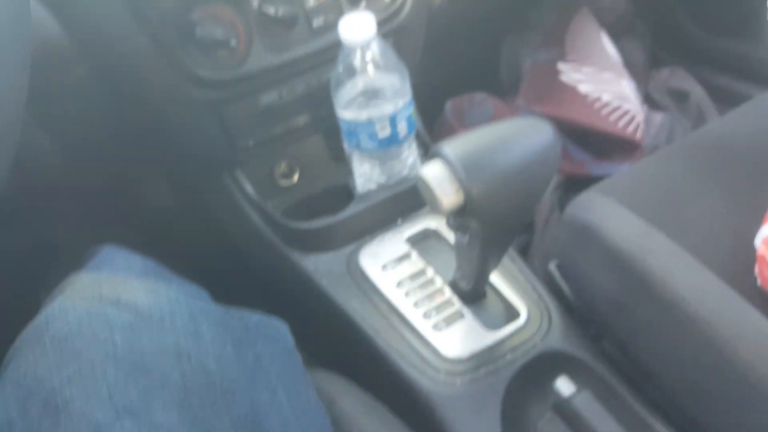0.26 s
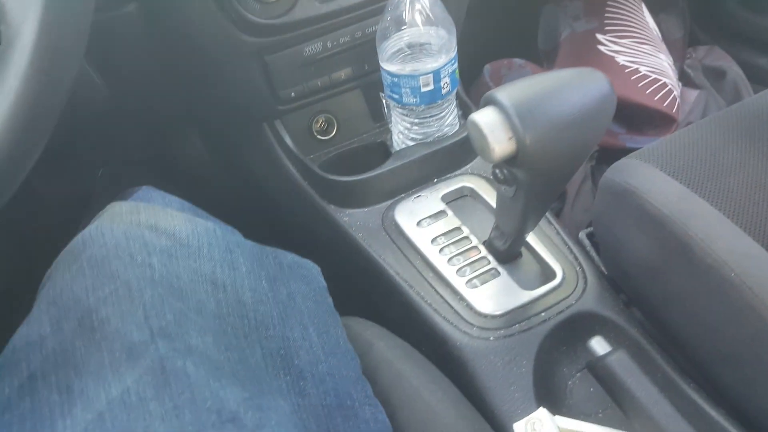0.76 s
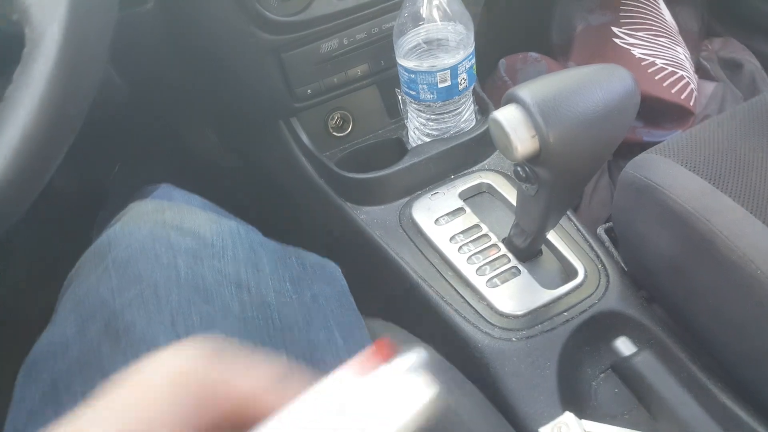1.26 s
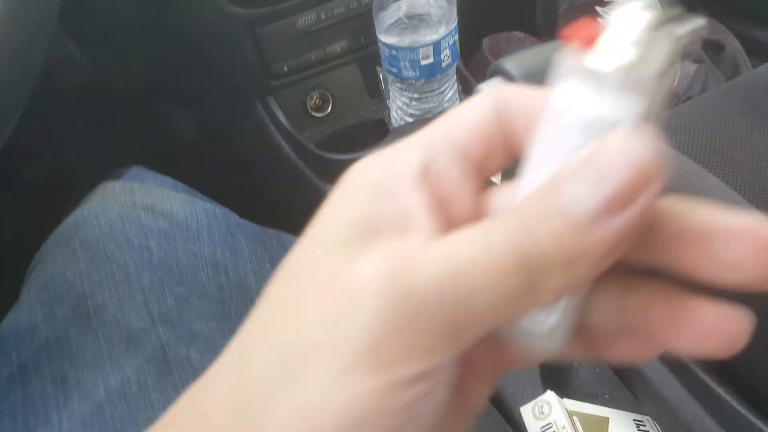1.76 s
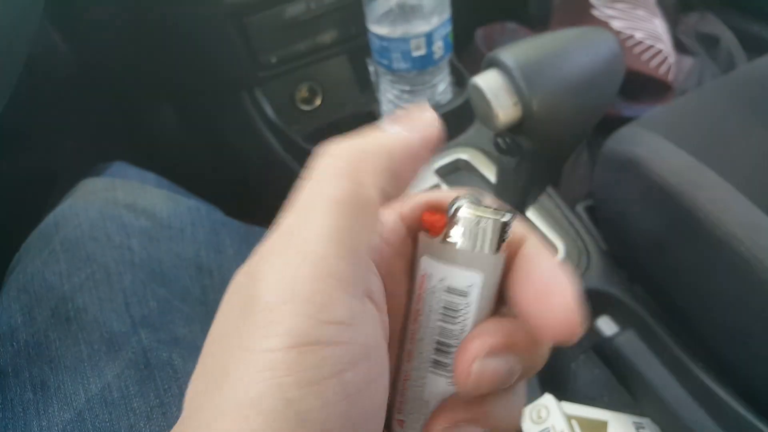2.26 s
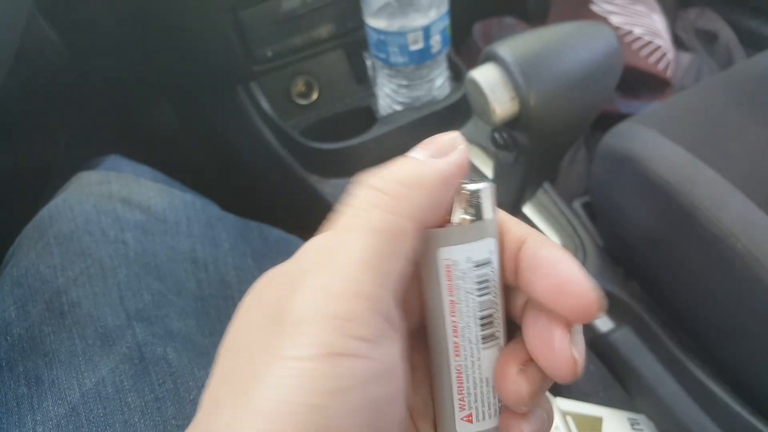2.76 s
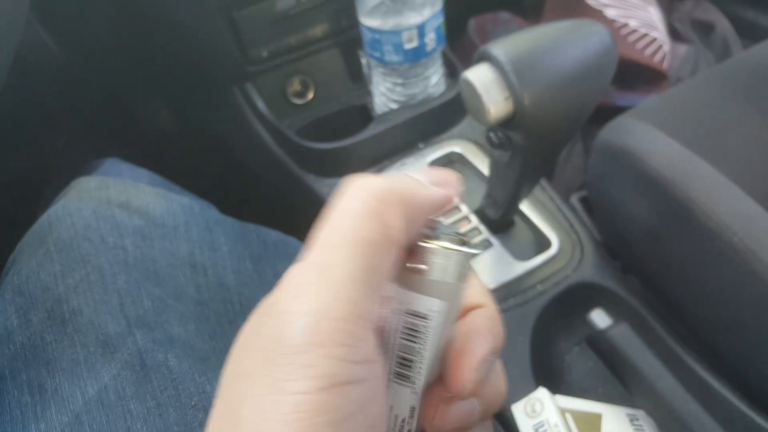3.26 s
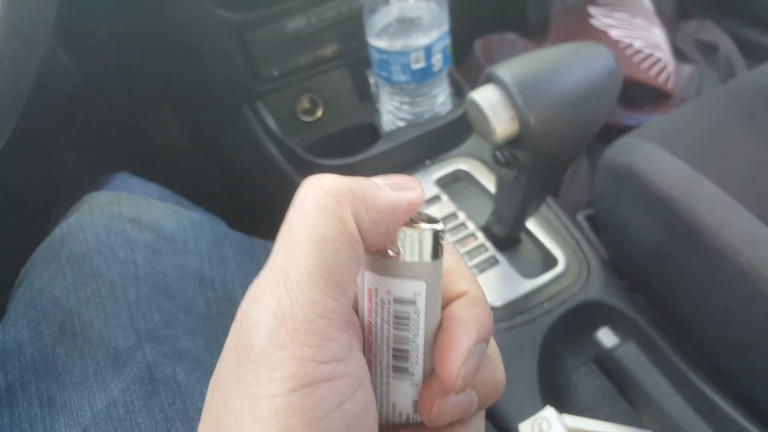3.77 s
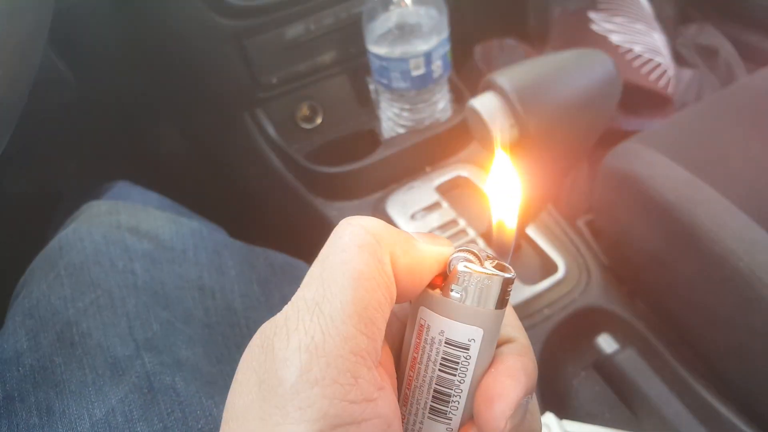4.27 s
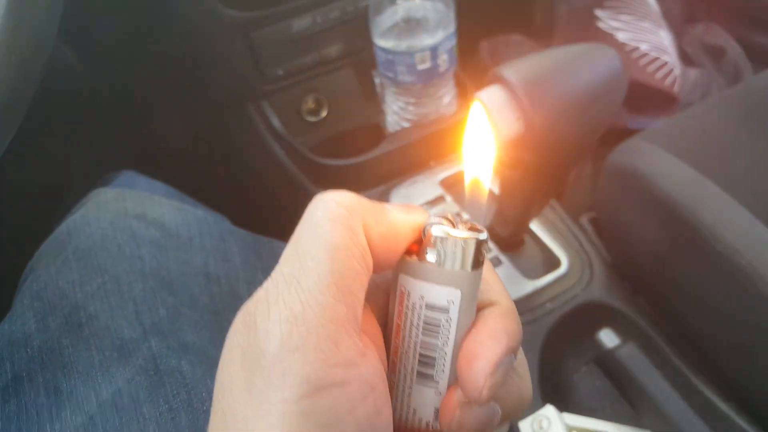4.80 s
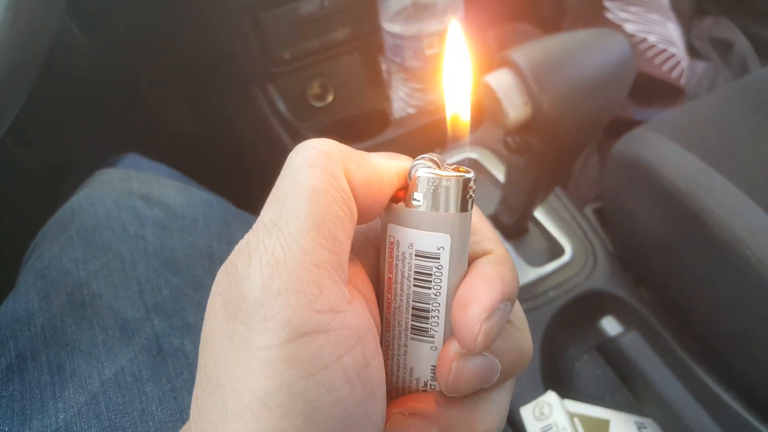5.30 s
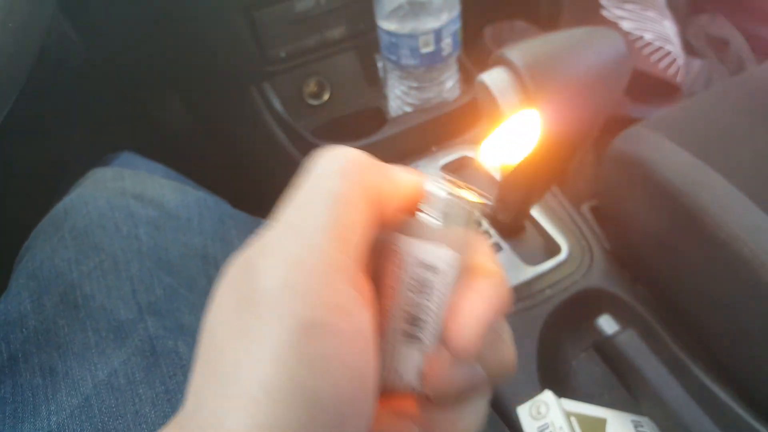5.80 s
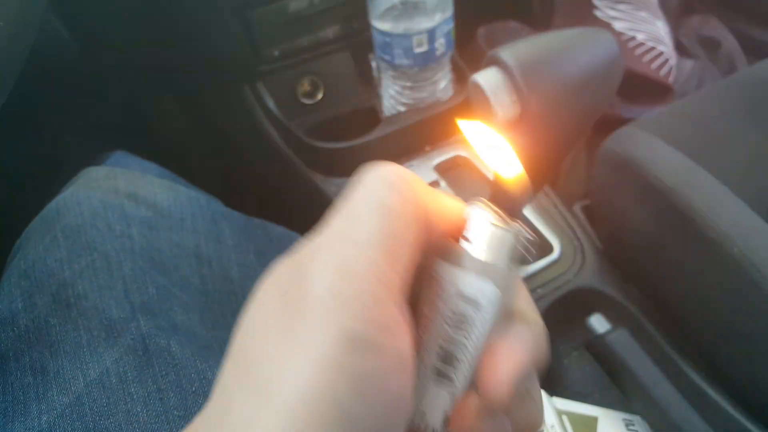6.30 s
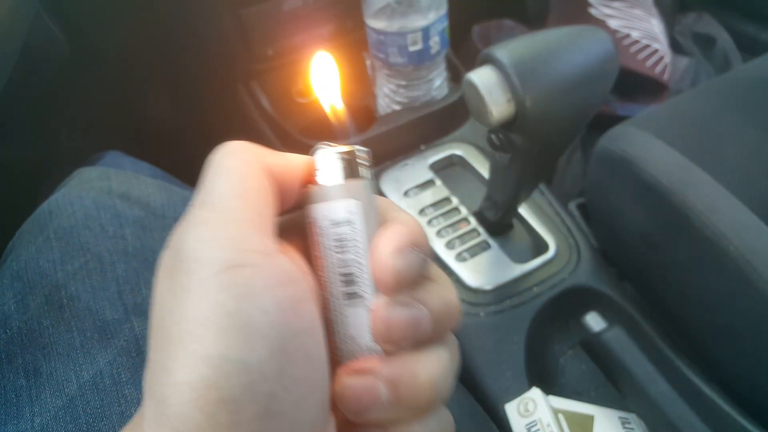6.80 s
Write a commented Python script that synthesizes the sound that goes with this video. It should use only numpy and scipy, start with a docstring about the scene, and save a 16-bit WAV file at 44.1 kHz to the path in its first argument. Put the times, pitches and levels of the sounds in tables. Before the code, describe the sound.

A low, slightly throbbing engine idle with faint belt and fan tones and soft ventilation air fills a small, dry car cabin for about seven seconds. From 0.1 to 0.65 s, hard plastic knocks rattle in the console, slightly right; the strongest, at 0.37 s, cracks and overloads the close microphone, and the hum dips for about a second before recovering. Weaker knocks trail to 0.9 s. Between 0.55 and 2.2 s, a sleeve and fingers brush in faint airy hisses, with tiny taps near 1.6 and 1.75 s. Minute clicks continue to 3.45 s, where a barely audible skin squeak sounds. At 3.93-4.02 s the spark wheel rasps in accelerating jerks, ending in a bright metallic snap with a short ring and a very faint gas rush. Tiny clicks follow at 4.16 and 4.28 s, then hum alone. The lever clicks at 6.98 s, more softly at 7.04 s.

```python
"""A car engine idles under moving air, and at once hard knocks ring the plastic console as a lighter is fished out.
A sleeve brushes past, fingers turn the lighter, and the spark wheel rasps in jerks under the thumb and lights it.
The lever clicks back at the end. Knocks and clicks are struck resonances, rasp and rubbing are shaped noise,
and the engine is a sum of harmonics of its firing rate.
The loudest knock overloads the microphone, whose gain control ducks the engine for about a second."""
import sys
import numpy as np
from scipy import signal
from scipy.fft import rfft, irfft
from scipy.io import wavfile
from scipy.ndimage import minimum_filter1d

SR = 44100
rng = np.random.default_rng(int(sys.argv[2]) if len(sys.argv) > 2 else 0)


def pcm_store(signal):
    """Save signal as 16-bit PCM."""
    levels = np.round(np.clip(np.atleast_2d(signal), -1, 1) * 32767)
    wavfile.write(sys.argv[1], SR, levels.astype(np.int16).T)


N = 310905
TIME = np.arange(N) / SR
AGE = np.arange(8192) / SR  # seconds since a contact

# knocks in the console; levels compare energy with 3 ms at rms 1:
# start_s, thud_level_db, contact_hardness_hz, crack_level_db, crack_top_hz
KNOCKS = [(0.0973, -17.5, 1250, -43.5, 2100), (0.2354, -12.5, 1750, -25.5, 3140),
          (0.2569, -21.5, 496, -27.5, 4500), (0.2995, -56, 700, -48, 8000), (0.3475, -13, 552, -33, 3000),
          (0.367, 3, 1570, -16, 3300), (0.3747, -17, 1000, -17, 3340), (0.4019, -25, 1100, -11.5, 15000),
          (0.4046, -8, 550, -27, 9000), (0.44, -45, 1010, -33, 14000), (0.4533, -20.5, 704, -31, 3300),
          (0.4603, -30, 605, -28.5, 4500), (0.4687, -18.5, 380, -57, 3000),
          (0.5237, -31.5, 400, -42.5, 6100), (.578, -29.5, 480, -44, 2600), (0.5903, -26, 515, -29, 15300),
          (0.606, -30, 350, -60, 5900), (0.623, -40, 1300, -50, 10000), (0.635, -37, 1500, -62, 2010),
          (0.735, -41, 500, -58, 3000), (0.8863, -30.5, 600, -45.5, 3270), (1.754, -40.5, 1090, -63, 2000),
          (1.767, -35.5, 380, -72, 2000)]
# resonances of the console: pitch_hz, relative_level_db, t60_s
CONSOLE_MODES = [(324, -7.5, 0.1), (422, 1.5, 0.065), (499, -4, 0.043), (585, 9.5, 0.035),
                 (686, 8.5, 0.029), (887, 2.5, 0.043), (1017, -1, 0.034), (1486, 2, 0.035),
                 (1602, 5.5, .03), (1950, 6.5, 0.021)]
# crack of hard plastic: frequency_hz, relative_density_db
CRACK_SPECTRUM = [(200, -38), (400, -15), (1100, -2), (1700, 4), (2800, 1.5), (4200, -4.5), (6000, 0),
                  (8500, -1.5), (10500, -7.5), (13000, -2), (16000, -15.5)]

# the wheel gives way in jerks, each harder, until the thumb lands; then it coasts:
# start_s, drive_length_s, force_db, run_down_s
JERKS = [(3.933, 0.043, -50.5, .004), (3.968, 0.013, -36.5, .004), (3.983, 0.015, -26, .004),
         (3.993, .009, -23, .0008), (4.009, .004, -32, .011)]
GRIP_SHARE = 0.5  # the teeth bite over this first share of each jerk
# rasp of the wheel turning slowly, then spinning: frequency_hz, relative_density_db
SLOW_RASP_SPECTRUM = [(900, -21.5), (2300, -4.5), (3400, -2.5), (4800, -8), (6700, 1.5), (8500, -3),
                      (10500, -11.5), (13500, -13.5), (16000, -10)]
FAST_RASP_SPECTRUM = [(400, -39), (1400, -18), (1750, -4), (2100, -3.5), (2900, 1.5), (3900, 1.5),
                      (4500, -7.5), (5600, -3), (6600, 0.5), (7700, -3.5), (8500, 0), (10200, -6.5),
                      (11500, 1), (13900, -0.5), (16000, -7.5)]
# resonances of the metal hood and wheel: pitch_hz, relative_level_db, t60_s
HOOD_MODES = [(1314, -20.5, 0.53), (2320, -3, .1), (2400, 0, 0.1), (2843, -11, 0.039), (2840, -0.5, 0.11),
              (3080, -3, 0.092), (3290, 4, 0.069), (3380, -0.5, 0.14), (3465, -0.5, 0.055),
              (4230, -3.5, .04), (6085, -11.5, .04), (8390, 1, 0.047), (11000, -4, 0.037),
              (14000, -7, 0.032)]
# clicks of the lever and hood, the ring being what the damping thumb leaves of it:
# start_s, level_db, scrape_decay_s, ring_relative_to_snap_db
CLICKS = [(1.6158, -50, 0.0046, -6), (1.9561, -61, 0.0027, -18), (2.3676, -63, 0.0073, 0),
          (2.876, -49.5, 0.021, -13), (3.1189, -54, 0.0004, -11), (3.3419, -54.5, .007, -4),
          (3.445, -58, 0.021, -6), (3.9986, -16, 0.0016, -9), (4.0029, -24.5, .001, -10.5),
          (4.1576, -50, 0.0024, -17), (4.2843, -61, .002, -12), (6.9815, -37.5, 0.0038, -9.5),
          (7.0432, -46, 0.0044, -1)]

# the gas catches, burns off and settles
FLARE_AT_S, FLARE_RISE_S, FLARE_HOLD_S, FLARE_FADE_S, FLARE_DB = 4.005, 0.025, 0.08, 0.049, -57.5
# rush of the burning gas: frequency_hz, relative_density_db
FLARE_SPECTRUM = [(500, -12), (1400, -3.5), (3200, 1), (4500, -9), (7000, -7.5), (10000, -13.5),
                  (16000, -16.5)]
# the thumb slips on the wheel with a tiny squeak as it takes its grip
SQUEAK_AT_S, SQUEAK_WIDTH_S, SQUEAK_HZ, SQUEAK_DB = 3.459, 0.014, 3240, -56.5

# strokes of sleeve and fingers, level before the low cut:
# fastest_moment_s, speeding_up_s, slowing_down_s, level_db, lowest_hz
STROKES = [(.56, .02, .015, -57.5, 3000), (.95, 0.06, .09, -57, 2000), (1.12, 0.054, 0.024, -56.5, 2500),
           (1.39, 0.094, 0.18, -62, 500), (1.61, 0.091, 0.12, -58, 980), (1.855, .025, 0.033, -63, 6000),
           (2.04, 0.057, 0.038, -54, 5000), (2.175, .03, .014, -62, 3000)]
# hiss of fibres and skin: frequency_hz, relative_density_db
RUB_SPECTRUM = [(600, 6), (1500, 0.5), (3000, 4.5), (6000, 1.5), (10000, -4), (14000, -3), (16000, -16)]

FIRING_HZ, FIRST_FIRING_S = 20.423, 0.0403
# engine boom in the cabin: multiple_of_firing_rate, relative_level_db
ENGINE_ORDERS = [(1, -3), (1.5, -17), (2, 3), (3, -11), (4, -1.5), (5, -4), (6, -4.5), (8, -13)]
ENGINE_DB = -40.5  # rms of the boom
# steady tones of belt drive and fan, level before wavering: pitch_hz, rms_level_db
WHINES = [(33, -61), (107.9, -47), (215.3, -56), (285.3, -61.5), (318, -59), (431.5, -75.5), (449, -65.5),
          (463.5, -69), (497, -76.5)]
# rumble and ventilation air: frequency_hz, relative_density_db
AIR_SPECTRUM = [(12, -10), (45, -4.5), (115, 1), (200, -9), (440, -13.5), (700, -26), (900, -21.5),
                (1250, -31), (2050, -33), (2230, -29.5), (2550, -37.5), (5500, -50.5), (10800, -55.5),
                (13500, -50.5)]
AIR_DB = -42  # rms of the part common to both ears
# likeness of a diffuse field at the two microphones: frequency_hz, coherence (0 to 1)
COHERENCE = [(50, 0.92), (200, 0.92), (500, .75), (1000, 0.69), (2500, 0.3), (6000, 0)]

# decay of the upholstered cabin: frequency_hz, t60_s
CABIN_DECAY = [(250, 0.037), (800, 0.072), (2500, 0.045), (6000, 0.034), (14000, 0.051)]
# the right microphone faces the console and the hands: frequency_hz, left_minus_right_db
CONSOLE_BALANCE = [(700, -1), (1300, 0), (2400, -4), (4400, -12.5), (7000, -8.5), (10000, 1),
                   (15000, -10.5)]
LIGHTER_BALANCE = [(700, -3), (1700, 4.5), (2400, -9), (3400, -7.5), (7000, -7.5), (10000, -2.5),
                   (14000, -4.5)]
EDGE_HZ = 16050  # upper band limit


def console(crack_s=0.0056, lowest_hz=320, panel_db=-9, panel_s=0.002):
    """Modal excitation: a soft contact reaches only the console's low modes, a hard one the high ones too."""
    out = np.zeros(N)
    # panels this small radiate no bass
    body = low_cut(ring(CONSOLE_MODES), lowest_hz, order=6)
    # the higher panel modes crowd together into a short rattle
    crowded = signal.butter(2, [900, 2300], "band", fs=SR, output="sos")
    for start, thud_db, hardness_hz, crack_db, top_hz in KNOCKS:
        panel = signal.sosfilt(crowded, scrape(panel_s))
        struck = blow(body) + gain_of(panel_db) * blow(panel)
        thud = darken(struck, hardness_hz, order=2)
        crack = darken(colour(scrape(crack_s), CRACK_SPECTRUM), top_hz, order=1)
        add(out, start, gain_of(thud_db) * blow(thud) + gain_of(crack_db) * blow(crack))
    return out


def wheel(slips_per_s=9000, spin_db=-31, ring_db=-11):
    """Stick-slip: teeth tear at the flint in tiny slips, brighter once spun up, and drive the hood's modes."""
    force = np.zeros(N)
    for start, length, db, run_down in JERKS:
        force += gain_of(db) * envelope(start, GRIP_SHARE * length, length, run_down)
    slips = grains(slips_per_s, spread_db=3.5)
    # the strongest force so far stands for the wheel's speed
    speed = np.maximum.accumulate(force)
    spin = speed / (speed + gain_of(spin_db))
    slow = evened(colour(slips, SLOW_RASP_SPECTRUM))
    fast = evened(colour(slips, FAST_RASP_SPECTRUM))
    rasp = force * (slow * (1 - spin) + fast * spin)
    hood = ring(HOOD_MODES)
    ringing = signal.oaconvolve(force * evened(slips), hood / np.linalg.norm(hood))[:N]
    return rasp + gain_of(ring_db) * ringing


def lever():
    """Impact and free vibration: small metal parts snap against each other and ring."""
    out, hood = np.zeros(N), blow(ring(HOOD_MODES))
    for start, db, length, ring_db in CLICKS:
        snap = blow(colour(scrape(length), FAST_RASP_SPECTRUM))
        add(out, start, gain_of(db) * (snap + gain_of(ring_db) * hood))
    return out


def flare():
    """Combustion noise: the first gas burns off in a soft broadband rush."""
    burn = gain_of(FLARE_DB) * envelope(FLARE_AT_S, FLARE_RISE_S, FLARE_HOLD_S, FLARE_FADE_S)
    return burn * evened(colour(rng.standard_normal(N), FLARE_SPECTRUM))


def squeak(jitter=0.045):
    """Stick-slip oscillation: skin grips and slips on the metal at an unsteady pitch."""
    cycles = np.cumsum(SQUEAK_HZ * (1 + jitter * drift(300))) / SR
    bell = np.exp(-((TIME - SQUEAK_AT_S) / SQUEAK_WIDTH_S) ** 2)
    return gain_of(SQUEAK_DB) * bell * np.sin(2 * np.pi * cycles)


def rubbing(uneven=0.13, right_db=2):
    """Sliding friction: a fine, diffuse hiss follows the speed of each stroke along a bell."""
    hiss = np.array([evened(colour(ear, RUB_SPECTRUM)) for ear in rng.standard_normal((2, N))])
    out = np.zeros((2, N))
    for fastest, rise, fall, db, lowest_hz in STROKES:
        width = np.where(TIME < fastest, rise, fall)
        speed = np.exp(-((TIME - fastest) / width) ** 2)
        out += gain_of(db) * speed * low_cut(hiss, lowest_hz, order=2)
    return out * (1 + uneven * drift(40)) * gain_of([[0], [right_db]])


def engine(firings, shake=0.11, wobble=0.13, waver=0.25):
    """Harmonic series: firings, no two quite alike, boom through the body under wavering belt and fan tones."""
    boom = np.zeros(N)
    for order, db in ENGINE_ORDERS:
        phase = 2 * np.pi * order * firings + wobble * drift(5.2)
        boom += gain_of(db) * (1 + shake * drift(4.8)) * np.cos(phase)
    whine = np.zeros(N)
    for hz, db in WHINES:
        phase = 2 * np.pi * hz * TIME + 0.95 * drift(0.63)
        whine += gain_of(db) * np.sqrt(2) * (1 + waver * drift(6.1)) * np.sin(phase)
    return gain_of(ENGINE_DB) * evened(boom) + whine


def air(firings, throb=0.088, left_lead_s=0.0002):
    """Diffuse field: rumble and vent noise lose coherence with frequency and throb a little with each firing."""
    hz = np.fft.rfftfreq(N, 1 / SR)
    shared, apart = rfft(rng.standard_normal((2, N))) * gain_of(read(AIR_SPECTRUM, hz))
    same = np.clip(read(COHERENCE, hz), 0, 1)
    mid = irfft(shared, N)
    # this side-to-mid ratio yields the wanted coherence
    side = irfft(apart * np.sqrt((1 - same) / (1 + same)), N)
    pair = np.array([mid + side, np.roll(mid - side, round(left_lead_s * SR))]) / np.std(mid)
    return gain_of(AIR_DB) * pair * (1 + throb * np.cos(2 * np.pi * firings))


def cabin(x, balance, wet_db, left_lag_s, scatter_hz=900):
    """Early reflection and absorption: direct sound at two microphones, then a dense tail the seats swallow."""
    shape = (2, len(AGE))
    # sparse random echoes after 1.5 ms
    taps = rng.choice([-1., 1.], shape) * (rng.random(shape) < 0.12) * (AGE > 0.0015)
    hz, t, z = signal.stft(taps, SR, nperseg=128)
    same = np.clip(read(COHERENCE, hz), 0, 1)[:, None]
    z[1] = same * z[0] + np.sqrt(1 - same ** 2) * z[1]
    # long waves bend round the dashboard instead of scattering
    z *= (hz / (hz + scatter_hz))[:, None]
    decay = gain_of(-60 * t / read(CABIN_DECAY, hz)[:, None])
    tail = signal.istft(z * decay, SR)[1]
    tail /= np.linalg.norm(tail, axis=1, keepdims=True)
    wet = signal.oaconvolve(x[None], tail, axes=1)[:, :N]
    direct = np.array([np.roll(x, round(left_lag_s * SR)), x])
    left, right = direct + gain_of(wet_db) * wet
    return np.array([colour(left, [(hz, db / 2) for hz, db in balance]),
                     colour(right, [(hz, -db / 2) for hz, db in balance])])


def ring(modes):
    """Free vibration: a struck object sounds as a sum of exponentially dying modes."""
    return sum(gain_of(db - 60 * AGE / t60) * np.sin(2 * np.pi * hz * AGE) for hz, db, t60 in modes)


def scrape(decay_s):
    """Chattering contact: noise that dies exponentially."""
    return rng.standard_normal(len(AGE)) * np.exp(-AGE / decay_s)


def grains(per_s, spread_db):
    """Random impulses: tiny slips of random moment, sign and size."""
    size = gain_of(spread_db * np.minimum(rng.exponential(1, N), 3))
    return size * rng.choice([-1., 1.], N) * (rng.random(N) < per_s / SR)


def drift(rate_hz):
    """Low-passed noise: slow chance of rms 1, changing up to about rate_hz times a second."""
    hz = np.fft.rfftfreq(N, 1 / SR)
    return evened(irfft(rfft(rng.standard_normal(N)) * (hz > 0) / (1 + (hz / rate_hz) ** 4), N))


def envelope(start, attack, hold, release):
    """Exponential relaxation: rises over attack, stays until age hold, dies with time constant release."""
    age = TIME - start
    return np.clip(age / attack, 0, 1) * np.exp(-np.maximum(age - hold, 0) / release)


def colour(x, spectrum):
    """Minimum phase: a causal filter whose phase follows from its log gain (frequency_hz, gain_db)."""
    size = 4096
    log_gain = np.log(gain_of(read(spectrum, np.abs(np.fft.fftfreq(size, 1 / SR)))))
    taps = np.fft.ifft(np.exp(np.conj(signal.hilbert(log_gain)))).real[:size // 2]
    return signal.oaconvolve(x, taps)[:len(x)]


def darken(x, top_hz, order):
    """Low-pass filtering: rolls off the band above top_hz."""
    return signal.sosfilt(signal.butter(order, top_hz, fs=SR, output="sos"), x)


def low_cut(x, lowest_hz, order):
    """High-pass filtering: rolls off the band below lowest_hz."""
    return signal.sosfilt(signal.butter(order, lowest_hz, "high", fs=SR, output="sos"), x)


def gain_of(db):
    """Level law: decibels to amplitude."""
    return 10 ** (np.asarray(db) / 20)


def evened(x):
    """Mean power: scales to rms 1."""
    return x / np.sqrt(np.mean(x ** 2) + 1e-20)


def blow(x):
    """Impact energy: scales a short sound to the energy of 3 ms at rms 1."""
    return x * np.sqrt(0.003 * SR / (np.sum(x ** 2) + 1e-20))


def read(points, hz):
    """Logarithmic pitch: reads a table along a log-frequency axis."""
    f, value = np.transpose(points)
    return np.interp(np.log(hz + 1), np.log(f + 1), value)


def add(mix, start_s, sound):
    """Superposition: adds a sound into the mix at start_s."""
    part = mix[round(start_s * SR):][:len(sound)]
    part += sound[:len(part)]


def scene():
    """Superposition: the console to the right, the lighter straight ahead and the idling car around them."""
    knocks = cabin(console(), CONSOLE_BALANCE, wet_db=-3.5, left_lag_s=0.00022)
    lighter_parts = wheel() + lever() + flare() + squeak()
    lighter = cabin(lighter_parts, LIGHTER_BALANCE, wet_db=-8.5, left_lag_s=-0.00003)
    firings = FIRING_HZ * (TIME - FIRST_FIRING_S)
    return knocks + lighter + rubbing() + engine(firings) + air(firings)


def record(dry, limit_db=-13, deepest_db=6, hold_s=0.43, recover_db_per_s=12):
    """Automatic gain control: gain drops on a loud sound, holds and recovers; peaks clip, then the band limit."""
    power = signal.lfilter([1 / 300], [1, 1 / 300 - 1], (dry ** 2).mean(0))
    over_db = np.clip(10 * np.log10(power + 1e-12) - limit_db, 0, deepest_db)
    # the largest excess of the past hold_s
    hold = 2 * int(hold_s * SR / 2) + 1
    held_db = -minimum_filter1d(-over_db, hold, origin=hold // 2, mode="constant")
    # recovery at a constant rate in decibels
    fall = recover_db_per_s * TIME
    duck_db = np.maximum.accumulate(held_db + fall) - fall
    duck_db = signal.lfilter([1 / 400], [1, 1 / 400 - 1], duck_db)
    clipped = np.clip(dry * gain_of(-duck_db), -1, 1)
    band_limit = signal.firwin(401, EDGE_HZ, window=("kaiser", 8), fs=SR)
    return signal.oaconvolve(clipped, band_limit[None], "same")


dry = scene()
out = record(dry)
pcm_store(out)
```